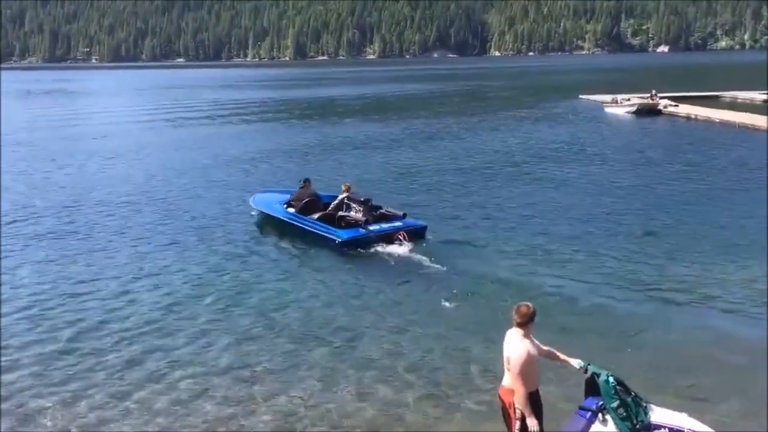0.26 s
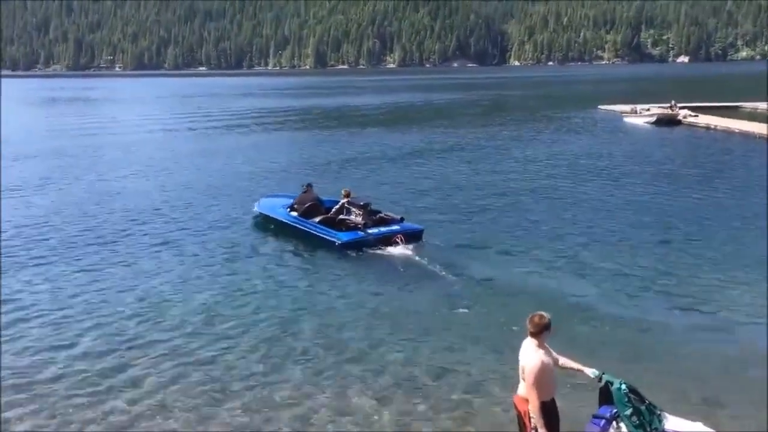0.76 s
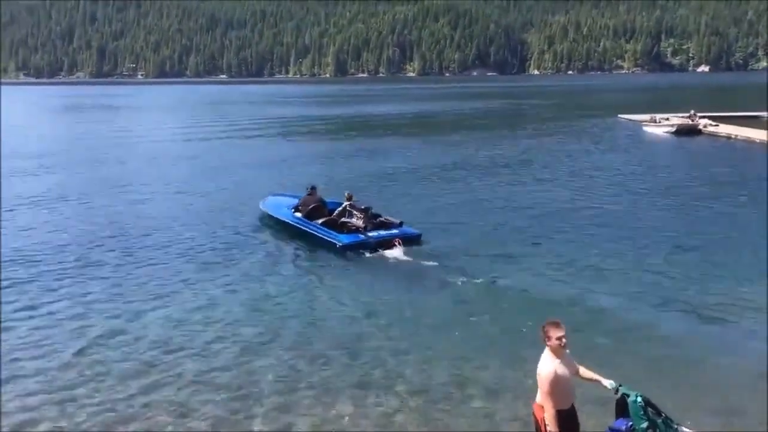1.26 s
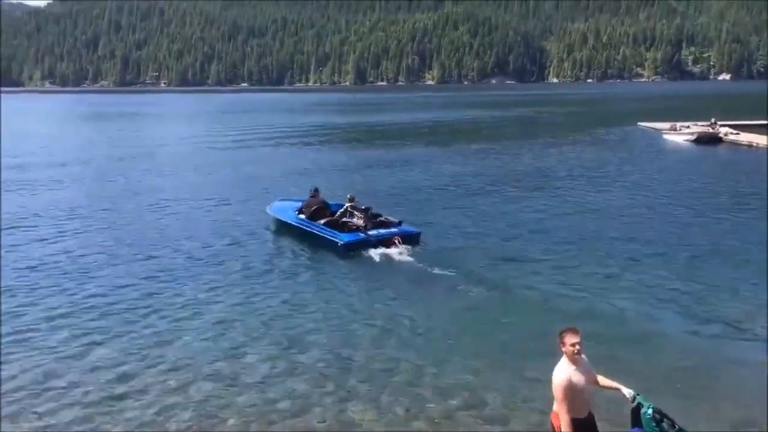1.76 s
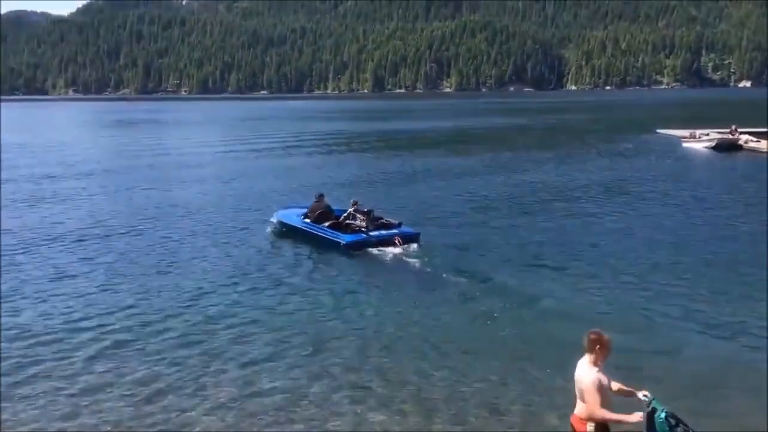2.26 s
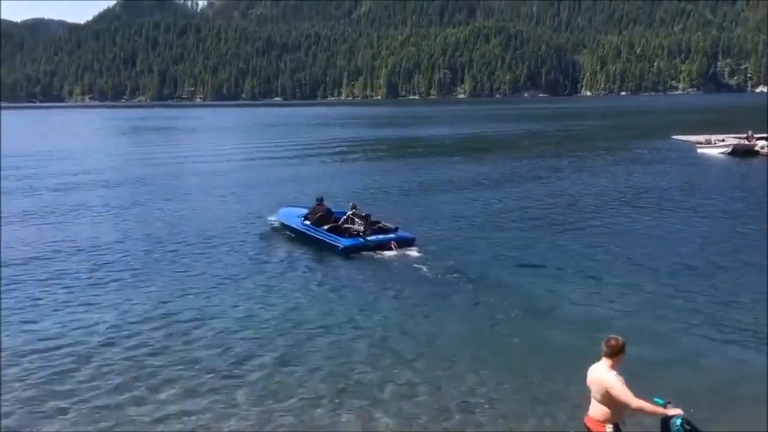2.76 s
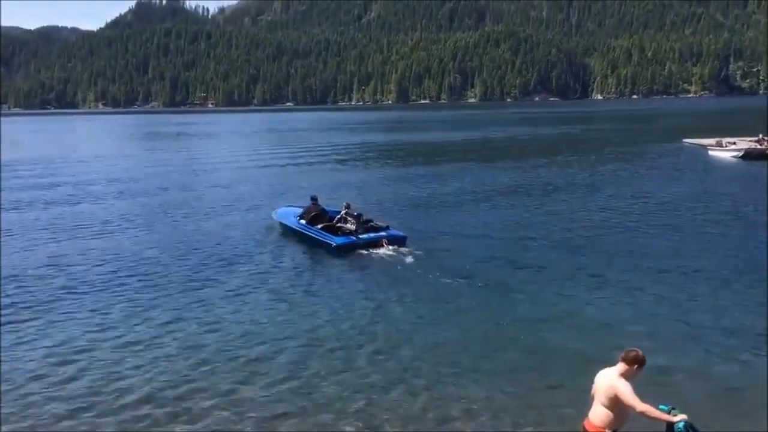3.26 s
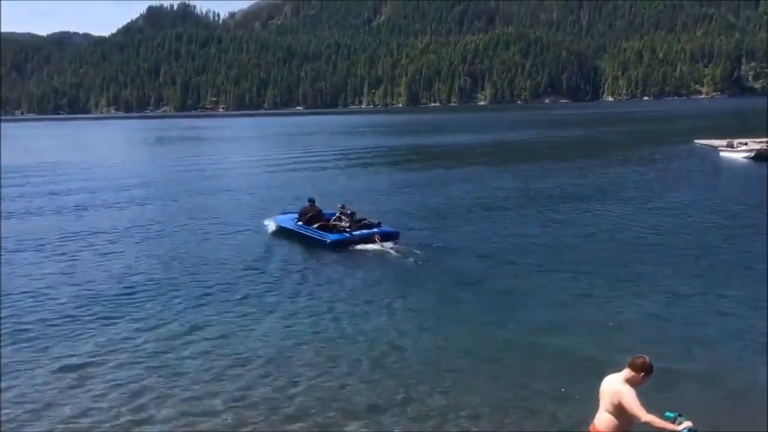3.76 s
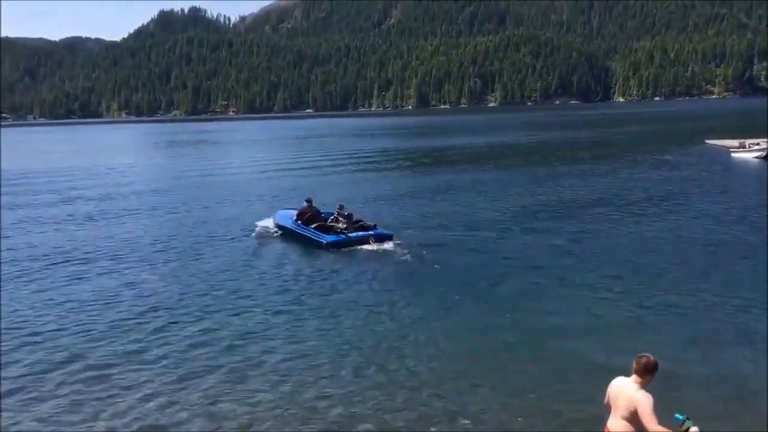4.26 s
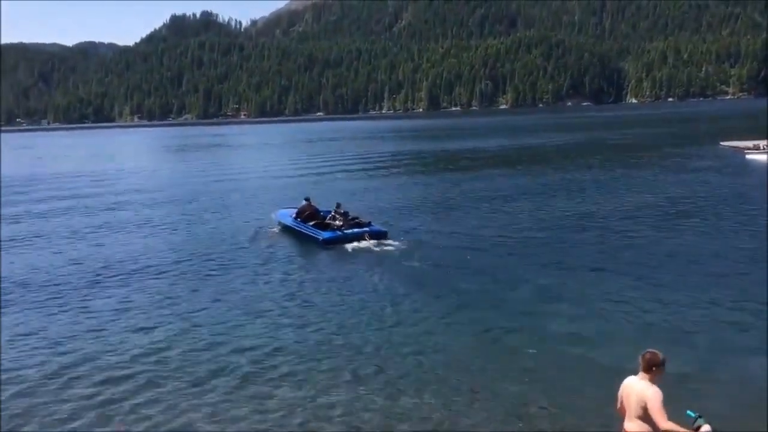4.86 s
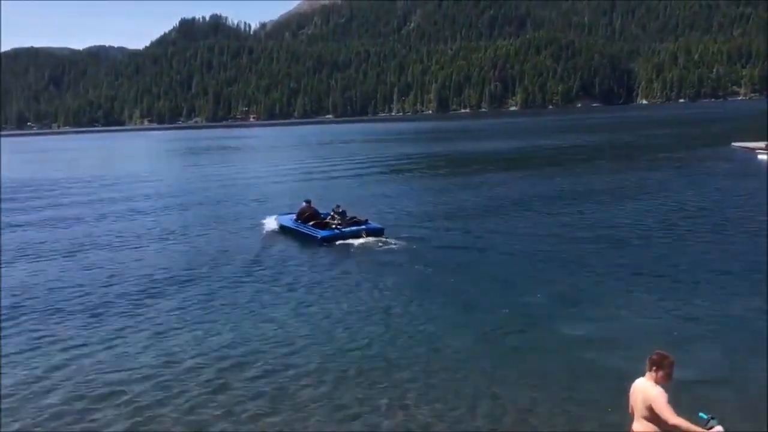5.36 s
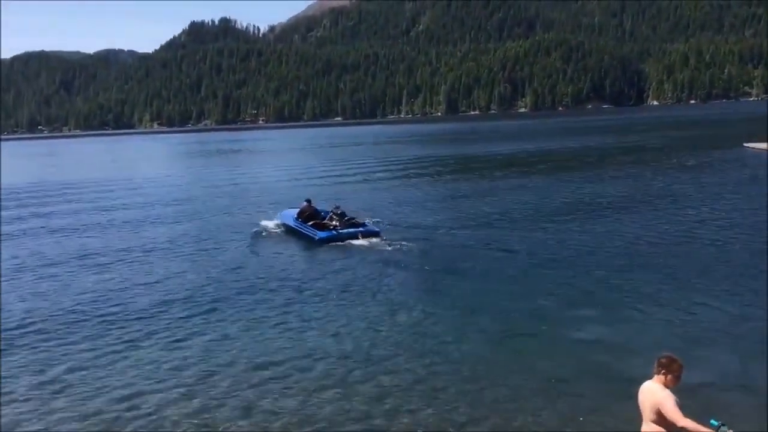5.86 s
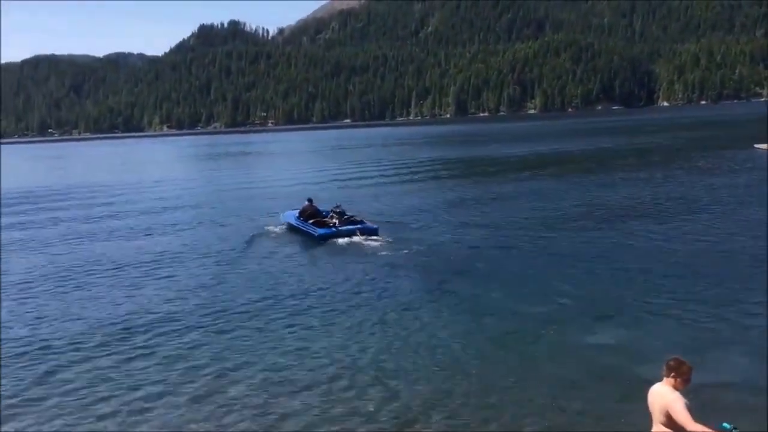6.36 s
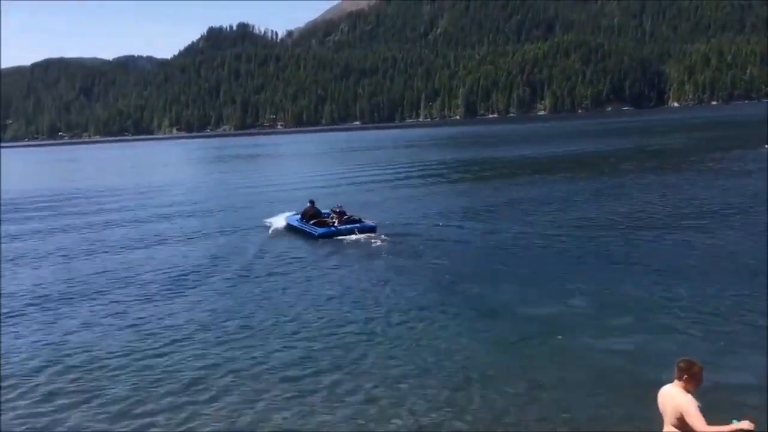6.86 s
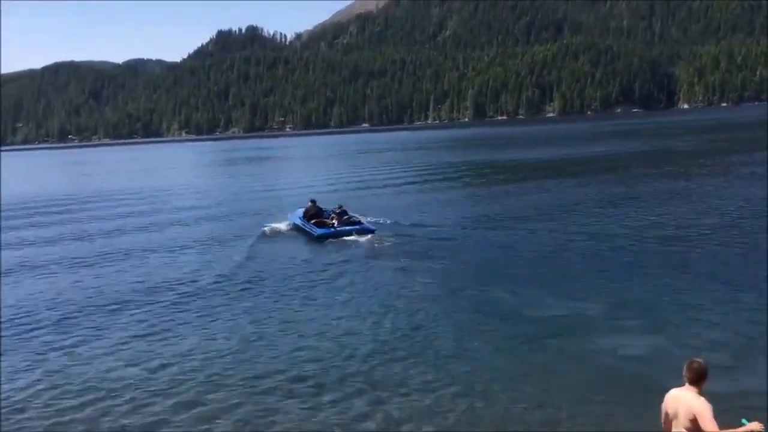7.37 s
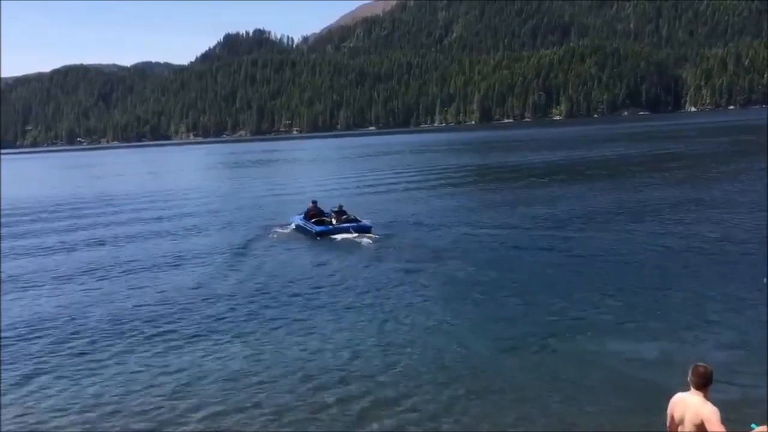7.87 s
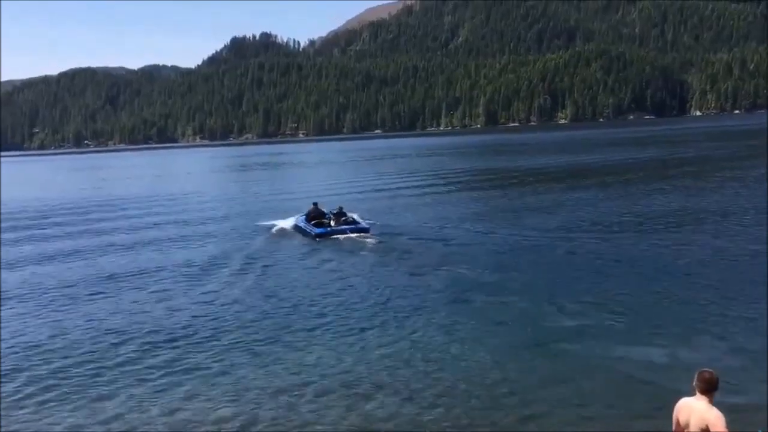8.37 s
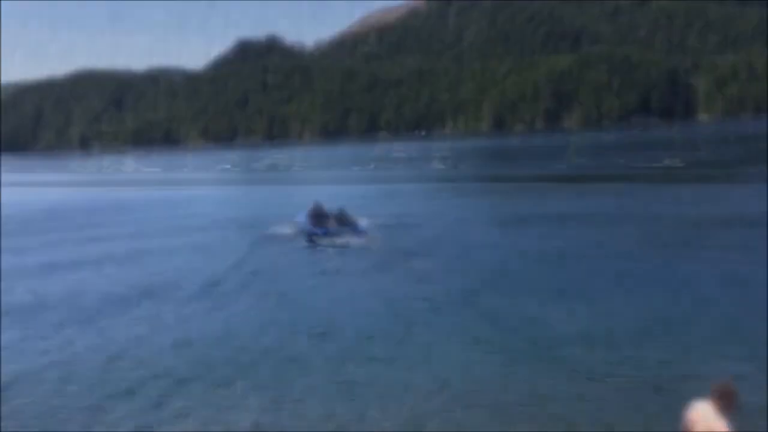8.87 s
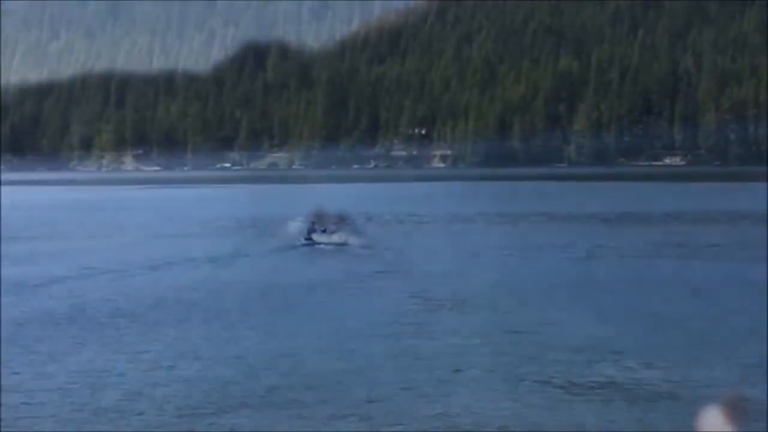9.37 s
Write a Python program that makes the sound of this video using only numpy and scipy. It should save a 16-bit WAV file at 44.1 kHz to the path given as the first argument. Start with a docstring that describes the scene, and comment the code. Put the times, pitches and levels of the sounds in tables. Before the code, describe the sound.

Heard from one microphone at the edge of a lake, a boat engine idles throughout with a deep, uneven, chugging rumble. Water in the exhaust sputters and hisses in quick pulses, surging and easing over a throaty rasp. As the boat slowly draws off, the hiss softens into a duller wash while the low throb holds. Soft breeze and water lie underneath.

```python
"""A low, loping throb and a wet hiss, heard by one microphone on a lake shore: a jet boat idles away,
its bare V8 running on open, water-cooled exhaust pipes. Each firing is a thump with a spit of wet gas;
uneven cylinders make the pipes lope, and they boom when the engine quickens. The lake mirrors the
sound, and the exhaust swells hollowly now and then. With distance the spitting dulls and blurs."""
import sys
import numpy as np
from scipy import signal
from scipy.fft import rfft, irfft, next_fast_len
from scipy.io import wavfile
from scipy.ndimage import uniform_filter1d, map_coordinates

SR = 44100
rng = np.random.default_rng(int(sys.argv[2]) if len(sys.argv) > 2 else 0)


def transcribe(signal):
    """Save signal, clipped to [-1, 1], as a 16-bit WAV file at the path in sys.argv[1]."""
    frames = np.atleast_2d(signal).T
    limited = np.clip(frames, -1, 1)
    pcm = np.round(limited * 32767).astype(np.int16)
    wavfile.write(sys.argv[1], SR, pcm)


N = 424683
TIME = np.arange(N) / SR

# idle speed: t/s, firing rate/Hz
FIRING_RATE = [(0.0, 62.64), (0.4, 66.16), (1.09, 66.11), (1.38, 70.3), (1.71, 66.47), (2.28, 65.31),
               (2.6, 67.03), (3.3, 67.95), (3.72, 64.64), (3.9, 65.95), (5.01, 67.14), (5.1, 68.27),
               (5.68, 65.99), (6.24, 71.37), (6.75, 67.29), (7.26, 68.62), (7.43, 70.15), (7.83, 68.05),
               (8.4, 70.13), (9.63, 68.59)]
# the wettest firings: t/s, spit level against its neighbours/dB, bubble f/Hz
WETTEST = [(0.743, 5.1, 4300.0), (0.895, 6.2, 4100.0), (1.255, 6.3, 4200.0), (2.099, 5.1, 4500.0),
           (2.298, 4.6, 4200.0), (2.343, 4.4, 4600.0), (3.475, 4.4, 5200.0), (3.596, 8.7, 6600.0),
           (3.796, 4.6, 2500.0), (4.28, 5.2, 5600.0), (4.566, 4.7, 5800.0), (5.044, 4.5, 5400.0),
           (5.339, 4.4, 4800.0), (5.398, 6.1, 5600.0), (5.594, 6.6, 3200.0), (5.638, 4.9, 6600.0),
           (6.067, 4.6, 2900.0), (6.153, 4.4, 4700.0), (6.712, 4.8, 3300.0), (6.771, 6.0, 5300.0),
           (6.86, 6.9, 5600.0), (7.3, 6.2, 5300.0), (7.415, 6.4, 8000.0), (7.501, 5.4, 4200.0),
           (7.574, 4.3, 5800.0), (7.645, 5.0, 3100.0), (7.762, 5.6, 3400.0), (7.923, 4.5, 3400.0),
           (7.996, 5.6, 6000.0), (8.04, 6.0, 6400.0), (8.083, 7.3, 6000.0), (8.112, 7.4, 6400.0),
           (8.272, 6.0, 5500.0), (8.315, 5.5, 3800.0), (8.57, 5.9, 6800.0), (8.684, 6.5, 4900.0),
           (8.915, 5.6, 4800.0), (9.146, 6.0, 6500.0), (9.465, 4.6, 3500.0), (9.494, 6.5, 3300.0),
           (9.508, 4.3, 3600.0)]


def amp(db):
    """Decibels to gain."""
    return 10 ** (np.asarray(db) / 20)


def unit(x):
    """Scale to rms 1."""
    return x / np.sqrt(np.mean(x ** 2) + 1e-20)


def noise():
    """Fresh white noise."""
    return rng.standard_normal(N)


def curves(rows):
    """One value per sample for each column after the time."""
    s, *columns = np.transpose(rows)
    return [np.interp(TIME, s, column) for column in columns]


def wobble(rate):
    """A smooth random curve, rate knots a second."""
    return map_coordinates(rng.standard_normal(int(N * rate / SR) + 4), [TIME * rate])


def filtered(x, response):
    """x times a complex response of frequency."""
    size = next_fast_len(N + SR // 2)
    return irfft(rfft(x, size) * response(np.fft.rfftfreq(size, 1 / SR)), size)[:N]


def lowpass(x, corner_hz, order):
    """x rolled off above the corner, without delay."""
    return filtered(x, lambda hz: 1 / (1 + (hz / corner_hz) ** order))


def coloured(x, points):
    """x through a spectrum of (f/Hz, level/dB) points, at rms 1."""
    f, db = np.transpose(points)
    return unit(filtered(x, lambda hz: amp(np.interp(np.log(hz + 1), np.log(f), db, -120, -120))))


def resonate(x, modes):
    """x ringing in (f/Hz, width/Hz, level/dB) resonances, at rms 1."""
    def response(hz):
        return sum(amp(db) * 1j * hz * width / (f * f - hz * hz + 1j * hz * width)
                   for f, width, db in modes)
    return unit(filtered(x, response))


def crank(start=.545, hunting=.018):
    """Firings counted so far, hunting slightly; each whole number is the crest of a thump."""
    return start + np.cumsum(curves(FIRING_RATE)[0]) / SR + hunting * wobble(10)


def firing_at(firings, s):
    """Number of the firing nearest to each time."""
    return np.round(np.interp(s, TIME, firings)).astype(int)


def quickening():
    """Firing rate above the mean idle speed, in Hz."""
    rate, = curves(FIRING_RATE)
    return rate - rate.mean()


def per_cylinder(count, column):
    """One trait of the eight uneven cylinders, repeated over count firings."""
    # in firing order: push level/dB, spit level/dB, push lag/firings, spit lag/firings
    cylinders = [(4.9, .4, -.03, -.01), (.9, -.8, .02, .05), (-3.8, .7, .31, .02), (-2.4, 1.2, -.01, -.01),
                 (1.9, .8, -.01, .04), (3.3, 0, -.03, 0), (-3.7, -.4, -.01, .03), (-.9, -4, .27, .01)]
    return np.resize(np.array(cylinders)[:, column], count)


def bob(period_s=1.5, crest_s=5.2, growth_per_s=.12):
    """Relative height of the stern on the swell, which lifts it more further from shore."""
    since_crest = TIME - crest_s
    return (1 + growth_per_s * since_crest) * np.cos(2 * np.pi * since_crest / period_s)


def thump(firings, tone_db=-15.87, db_per_s=-.0639, db_per_hz=-.3, beat_hz=82, beat_db=-29.5):
    """The firing tone weakens with distance and engine speed; late on, a second tone beats against it."""
    # the firing tone sags for a moment: t/s, half length/s, depth/dB
    sags = [(1.31, 0.028, 7), (1.45, 0.092, 2.5), (6.288, 0.089, 2), (6.948, 0.032, 1), (7.402, 0.04, 3.5),
            (8.18, 0.022, 11)]
    sag_db = sum(depth * np.exp(-((TIME - s) / half) ** 2) for s, half, depth in sags)
    level_db = tone_db + db_per_s * TIME + db_per_hz * quickening() - sag_db + .7 * wobble(16)
    tone = amp(level_db) * np.cos(2 * np.pi * firings)
    swell_db = 35 * np.minimum(TIME - 8.85, 0)  # rises to a plateau near the end
    second_tone = amp(beat_db + swell_db) * np.sin(2 * np.pi * beat_hz * TIME)
    return np.sqrt(2) * (tone + second_tone)


def pushes(firings, scatter_db):
    """One impulse of gas for each firing, sized and timed by its cylinder."""
    count = int(firings[-1])
    sizes = amp(per_cylinder(count, column=0) + scatter_db * rng.standard_normal(count))
    onsets = np.searchsorted(firings, np.arange(count) + per_cylinder(count, column=2))
    return np.bincount(onsets, sizes, N + 1)[:N]


def boom(firings, lope_db=-29, churn_db=-34, muffle_hz=330, open_hz=82, db_per_hz=.5, db_per_s=.28):
    """Uneven pushes ring in the pipes and chug once an engine cycle, over the churning of the gas."""
    # pipe resonances: f/Hz, width/Hz, level/dB
    pipe_modes = [(78, 63, -11.3), (179, 26, -19.4), (217.5, 9, -.5), (660, 317, -6.9)]
    # gas churning in the pipes: f/Hz, level/dB
    churn_spectrum = [(75, 5), (100, -1.5), (135, -1.5), (165, -5), (215, 7), (255, -3), (330, -8.5),
                      (400, -23)]
    # louder as the engine quickens towards resonance, and slowly as the boat leaves
    swell = amp(db_per_hz * quickening() + db_per_s * TIME)
    ringing = resonate(pushes(firings, scatter_db=1.2), pipe_modes)
    lope = filtered(ringing, lambda hz: 1 / (1 + (hz / muffle_hz) ** 6) / (1 + (open_hz / (hz + 1)) ** 16))
    churn = coloured(noise(), churn_spectrum)
    return amp(lope_db) * unit(swell * lope) + amp(churn_db) * unit(swell * churn)


def puffs(firings, rise=.081, fall=.17, scatter_db=2.5, dry_db=-17, trail=.39, blur_db=3, blur_s=8.36):
    """Envelope of the gas: a burst for each firing, then a fading trail of spray."""
    # firings that barely spit: t/s
    dry_firings = [.227, .485, .955, 1.091, 1.284, 1.514, 1.661, 3.672, 3.703, 3.948, 4.159, 4.521, 4.76,
                   5.147, 5.279, 5.383, 5.624, 6.096, 6.321, 6.919, 7.14, 7.372, 7.458, 8.155, 8.184, 8.414]
    count = int(firings[-1]) + 3
    size_db = per_cylinder(count, column=1) + scatter_db * np.clip(rng.standard_normal(count), -2, 1.4)
    wet_s, wet_db, _ = np.transpose(WETTEST)
    size_db[firing_at(firings, wet_s)] = wet_db
    size_db[firing_at(firings, dry_firings)] = dry_db
    index = (firings + .3).astype(int)  # each burst starts ahead of its crest
    lag = per_cylinder(count, column=3) + .02 * rng.standard_normal(count)
    age = firings - index - lag[index]  # in firings, like rise and fall
    burst = amp(size_db)[index] * np.exp(-.5 * (age / np.where(age < 0, rise, fall)) ** 2)
    spray = trail * amp(.5 * size_db)[firings.astype(int)] * np.exp(-(firings % 1))
    # far from the microphone, the separate spits blur into a wash
    blur = amp(blur_db * np.clip((TIME - blur_s) / .4, 0, 1))
    return np.hypot(burst / np.sqrt(blur), spray * blur)


def gargle(gas, start_db=-46, db_per_s=-2.44, pulsing=.31):
    """Water gargles low in the pipe mouths, clearest close to shore and lost with distance."""
    # f/Hz, level/dB
    gargle_spectrum = [(250, -17), (340, 0), (400, -3.5), (460, -29)]
    return amp(start_db + db_per_s * TIME) * coloured(gas ** pulsing * noise(), gargle_spectrum)


def squirting(squirt_db=4):
    """Hiss in which water at the pipe mouth gives each spit peaks of its own."""
    spectra = signal.stft(noise(), nperseg=256)[2]

    def patches(bins, frames):
        across_pitch = uniform_filter1d(rng.standard_normal(spectra.shape), bins, axis=0)
        return unit(uniform_filter1d(across_pitch, frames, axis=1))
    gain_db = squirt_db * np.tanh(patches(bins=5, frames=5)) + 1.1 * patches(bins=4, frames=50)
    return signal.istft(spectra * amp(gain_db), nperseg=256)[1][:N]


def spit_levels(bob_db=-.65, far_s=5.7, fade_db_per_s=1):
    """Gains in dB of the spitting and of its top, which swings with the stern and dulls far out."""
    # surges as water reaches the pipes, fading with distance: t/s, level/dB
    surges = [(0, -30), (.35, -26.5), (1, -29.5), (1.5, -27.5), (2.6, -29), (3.55, -27.5), (4, -29),
              (4.4, -28), (5.05, -26.3), (5.4, -28.5), (5.8, -30), (6.4, -29), (6.85, -26.5), (7.2, -29.5),
              (7.6, -32), (8.1, -29.5), (8.5, -32), (9, -35.5), (9.63, -34)]
    top_db = -.5 + bob_db * bob() - fade_db_per_s * np.maximum(TIME - far_s, 0)
    return curves(surges)[0], top_db


def spit(gas, hiss_db=1.85, ring_db=-8, ring_hz=2350, ring_width_hz=500, crisp_above_hz=2200):
    """Wet gas hisses from the pipe ends, most abruptly at the top, and leaves a ring in the tubes."""
    # body of the hiss: f/Hz, level/dB
    hiss_spectrum = [(500, -24), (1000, -5), (1700, -6), (2300, 1), (3000, -3), (4000, 3), (5000, 0.5),
                     (6300, 3), (7600, -4), (8300, -55), (10000, -44)]
    # fizz at its top: f/Hz, level/dB
    fizz_spectrum = [(6500, -71), (7700, -9.5), (8900, -2), (9600, -5), (10400, -9.5), (11300, -7),
                     (13000, -11.5), (15200, -15)]
    level_db, top_db = spit_levels()
    wet = squirting()
    crisp, smeared = unit(gas * wet), unit(gas ** .088 * wet)
    jet = crisp + lowpass(smeared - crisp, crisp_above_hz, order=4)
    hiss = amp(hiss_db) * coloured(jet, hiss_spectrum)
    fizz = amp(top_db) * coloured(gas ** 1.16 * wet[::-1], fizz_spectrum)
    ring = resonate(gas ** .71 * noise(), [(ring_hz, ring_width_hz, 0)])
    ring *= amp(ring_db + top_db - top_db.max())  # lost with the top as the boat draws off
    return amp(level_db) * (hiss + fizz + ring)


def pops(firings, gas, pop_db=-4.5, scatter_db=3, wet_db=1):
    """Each spit bursts a bubble that rings at a pitch of its own."""
    # bubbles of ordinary firings: t/s, f/Hz, relative spread
    bubbles = [(0, 4250, 0.092), (2.4, 4304, 0.13), (3.2, 5006, .3), (7, 4515, .3), (9.63, 3814, 0.29)]
    count = int(firings[-1]) + 3
    pitch, size = np.clip(rng.standard_normal((count, 2)).T, -2, 1.5)
    centre_hz, spread = (np.interp(np.arange(count), firings, c) for c in curves(bubbles))
    hz, size_db = centre_hz * np.exp(spread * pitch), scatter_db * size
    wet_s, _, wet_hz = np.transpose(WETTEST)
    wettest = firing_at(firings, wet_s)
    hz[wettest], size_db[wettest] = wet_hz, wet_db
    index = (firings + .3).astype(int)
    phase = 2 * np.pi * np.cumsum(hz[index]) / SR + .5 * wobble(900)
    envelope = amp(size_db)[index] * gas ** 2 / np.sqrt(1 + gas ** 2)
    return amp(spit_levels()[0] + pop_db) * unit(envelope * np.sin(phase))


def rasp(firings, gas, roar_db=4.5, bark_db=-7, pulsing=.23, db_per_s=.5, bob_db=.26):
    """A hollow roar partly follows the firings, and each push rings a throaty bark in the pipes."""
    # f/Hz, level/dB
    roar_spectrum = [(200, 12), (340, -9), (410, -15.5), (455, -23.5), (545, -1), (620, -14), (710, 1),
                     (900, -11.5), (1250, -5), (1800, -4), (2600, -8), (3500, -8.5), (4300, -24)]
    # higher pipe resonances: f/Hz, width/Hz, level/dB
    throat_modes = [(604, 40, -9), (716, 71, 13.5), (730, 140, -9)]
    # grows as the boat leaves and swings a little with the stern
    level_db = -39 + db_per_s * TIME + bob_db * bob() + .7 * wobble(20)
    roar = coloured(gas ** pulsing * squirting(squirt_db=7.5), roar_spectrum)
    bark = resonate(unit(pushes(firings, scatter_db=2)) + .8 * noise(), throat_modes)
    return amp(level_db) * (amp(roar_db) * roar + amp(bark_db) * bark)


def over_water(x, path_db=-2.3, mirror_db=-6, ripple_hz=3200, bob_ms=.044):
    """A bounce off the lake reaches the microphone just after the direct sound, cutting moving notches."""
    # mean lag of the bounce, shrinking as the boat turns away: t/s, lag/ms
    bounce_lag = [(0, 0.54), (2.45, 0.4), (2.9, 0.37), (6.2, 0.29), (9.63, 0.25)]
    lag = (curves(bounce_lag)[0] + bob_ms * bob()) * SR / 1000
    # ripples scatter its treble
    bounce = amp(mirror_db) * filtered(x, lambda hz: 1 / np.sqrt(1 + (hz / ripple_hz) ** 2))
    return amp(path_db) * (x + map_coordinates(bounce, [np.arange(N) - lag], order=1))


def lake(start_db=-35.5, fade_db=-1):
    """Breeze and lapping water on the shore around the microphone, slowly easing."""
    # f/Hz, level/dB
    shore_spectrum = [(10, 3), (45, 0.5), (100, 6.5), (300, -10.5), (1000, -45), (4000, -60), (15000, -41)]
    level_db = start_db + 2 * wobble(2) + fade_db * TIME / TIME[-1]
    return amp(level_db) * coloured(noise(), shore_spectrum)


def hollow_swells(gas, pulsing=.24):
    """A hollow midrange rush near 1 kHz swells now and then, pulsing with the firings."""
    # t/s, half length/s, level/dB
    swells = [(1.6, .15, -49), (3.083, 0.37, -43), (4.65, 0.28, -42.5), (6.27, 0.57, -41),
              (7.5, 0.31, -39.5), (9.11, 0.76, -39.5)]
    # f/Hz, level/dB
    hollow_spectrum = [(650, -16), (880, -5), (1200, -6.5), (1550, -20), (2000, -21)]
    envelope = sum(amp(db) * np.exp(-((TIME - s) / half) ** 4) for s, half, db in swells)
    return envelope * coloured(gas ** pulsing * noise(), hollow_spectrum)


def scene():
    """The departing boat and the lake, in mono from the shore."""
    firings = crank()
    gas = puffs(firings)
    exhaust = over_water(spit(gas) + pops(firings, gas) + rasp(firings, gas))
    return (thump(firings) + boom(firings) + gargle(gas) + hollow_swells(gas) + exhaust + lake())[None]


def record(dry, split_hz=900, top_hz=15500):
    """The microphone channel: the treble dips briefly now and then, and the band ends steeply."""
    # t/s, half length/s, depth/dB
    treble_dips = [(2.515, .012, 6), (3.89, .013, 15), (5.18, .01, 6), (6.007, .013, 8), (7.705, .018, 22),
                   (8.595, .011, 9), (8.978, .011, 9)]
    low = lowpass(dry[0], split_hz, order=4)
    dip_db = sum(depth * np.exp(-((TIME - s) / half) ** 4) for s, half, depth in treble_dips)
    treble = amp(-dip_db) * (dry[0] - low)
    return lowpass(low + treble, top_hz, order=120)[None]


dry = scene()
out = record(dry)
transcribe(out)
```